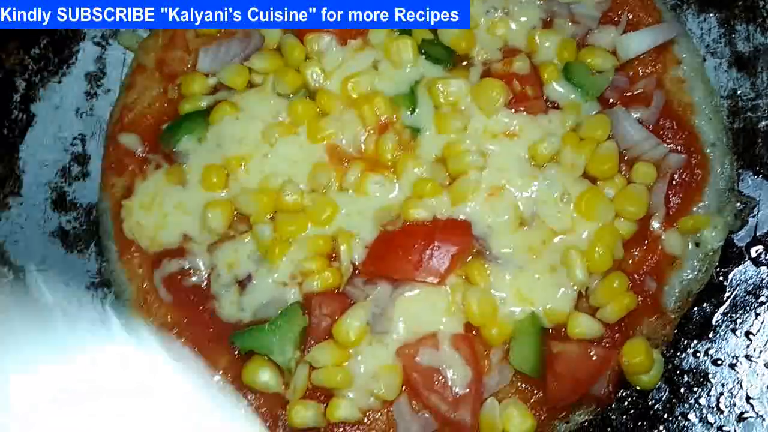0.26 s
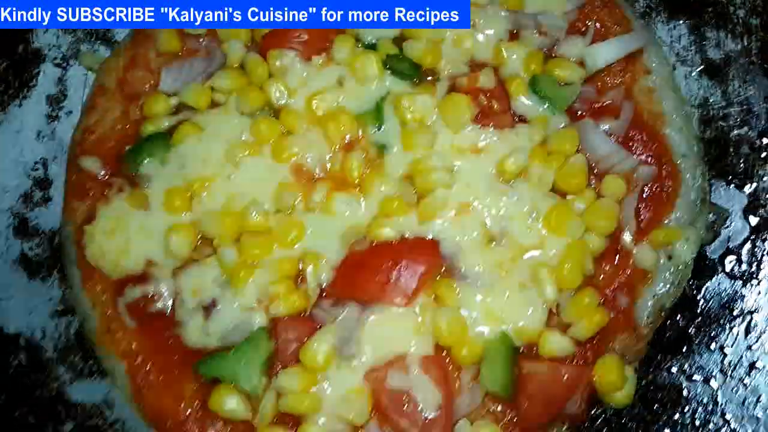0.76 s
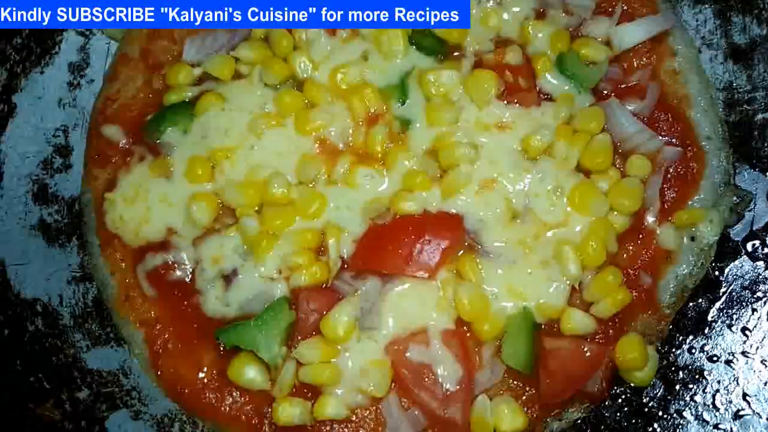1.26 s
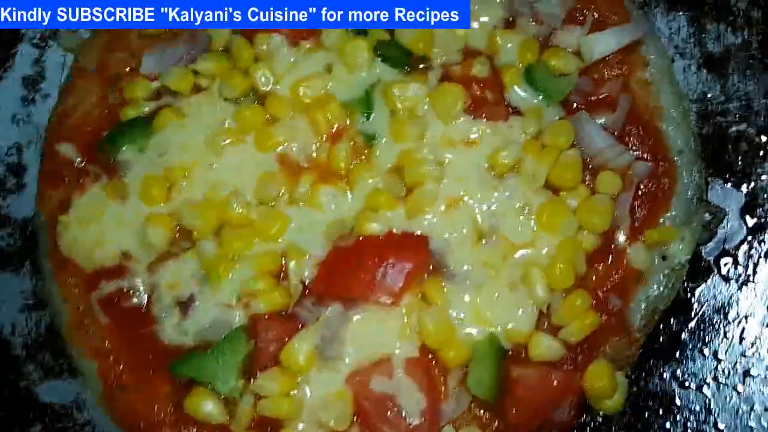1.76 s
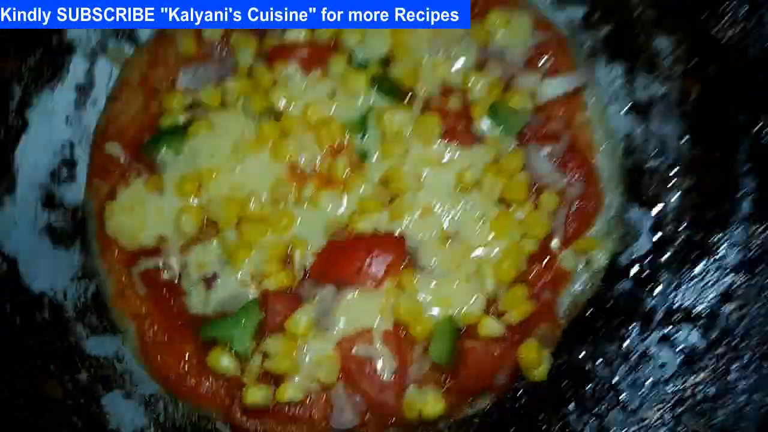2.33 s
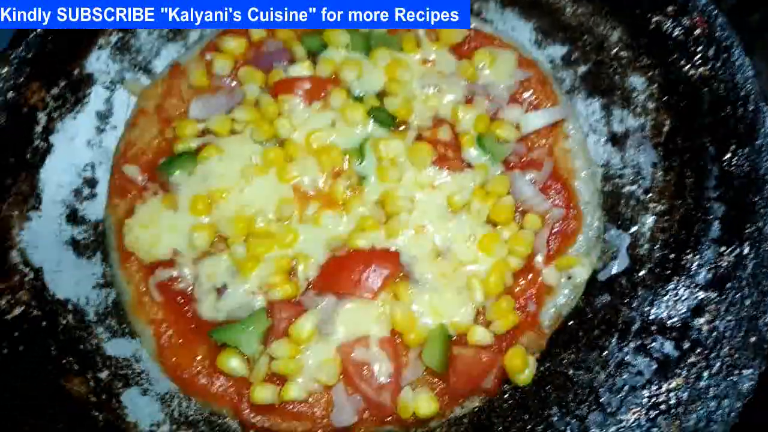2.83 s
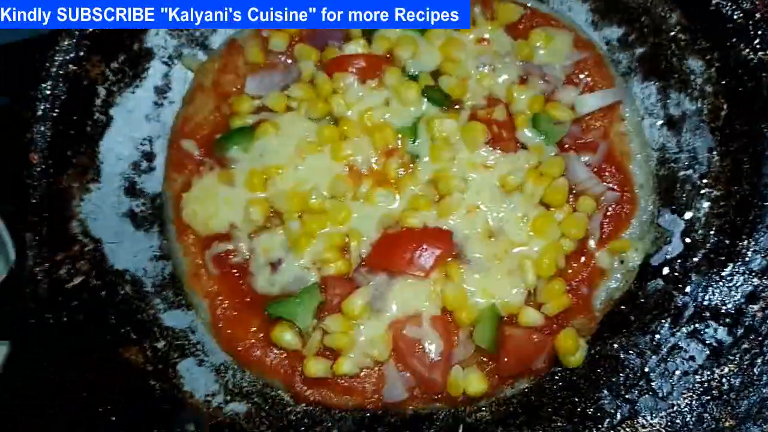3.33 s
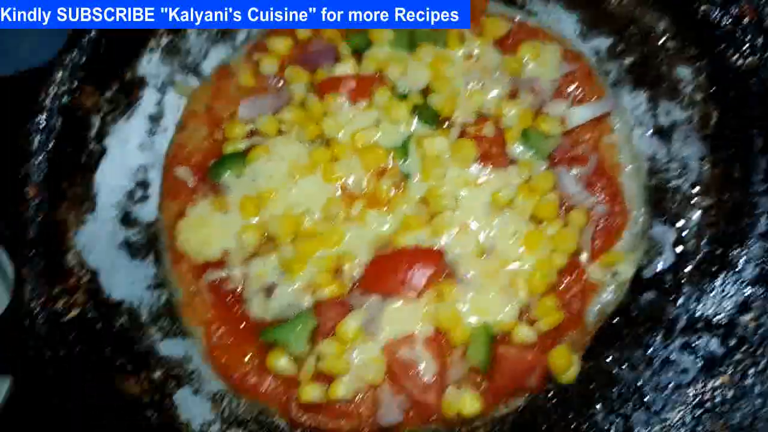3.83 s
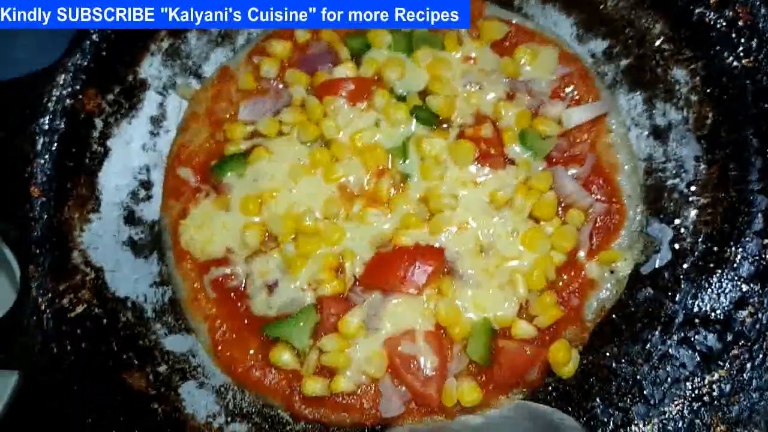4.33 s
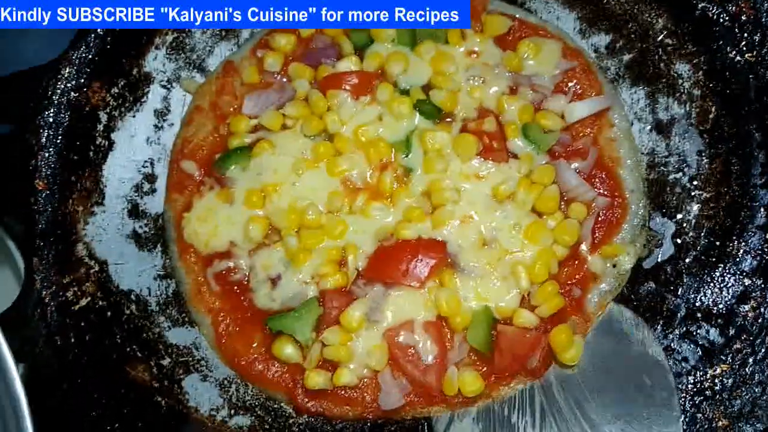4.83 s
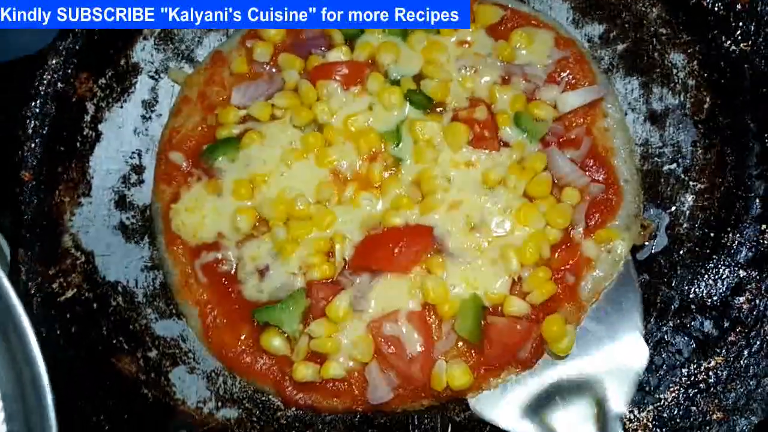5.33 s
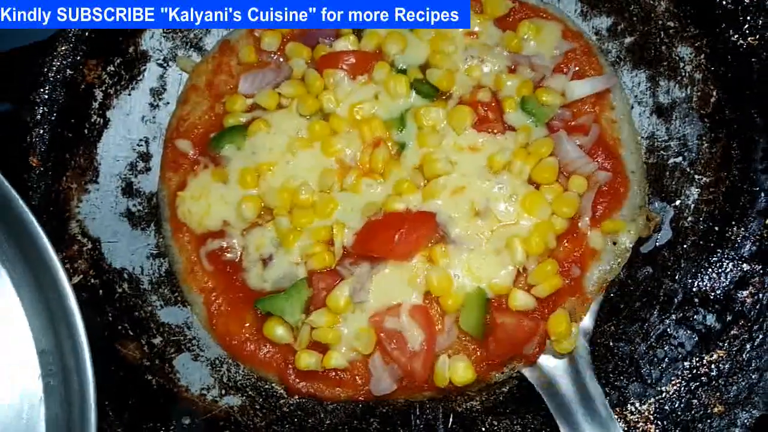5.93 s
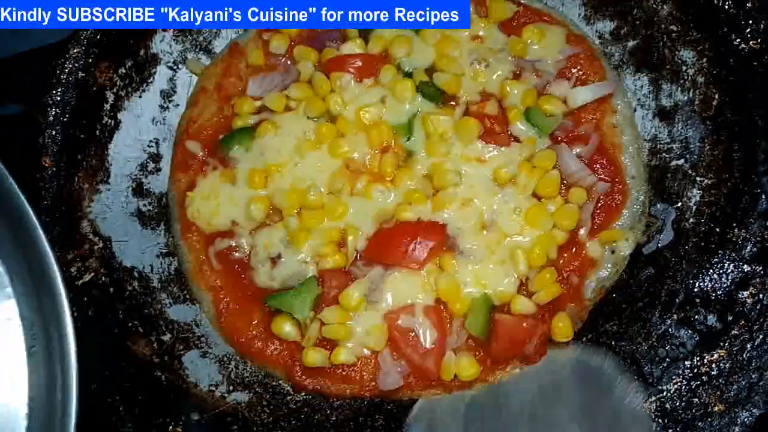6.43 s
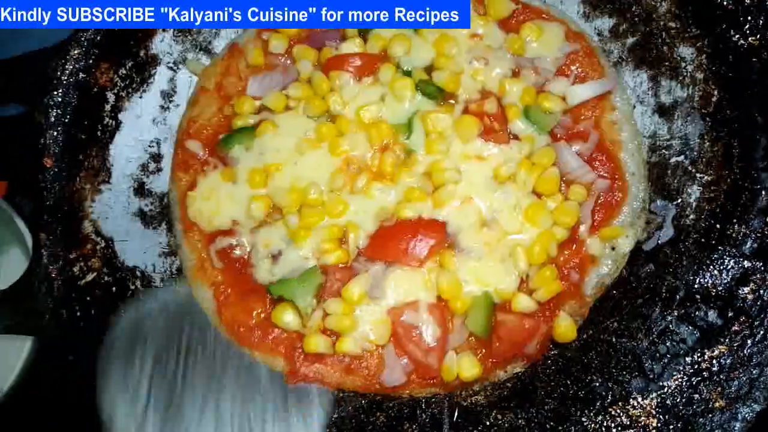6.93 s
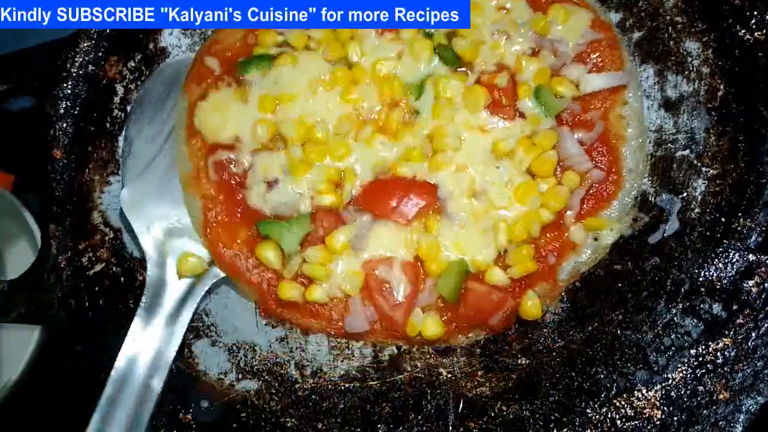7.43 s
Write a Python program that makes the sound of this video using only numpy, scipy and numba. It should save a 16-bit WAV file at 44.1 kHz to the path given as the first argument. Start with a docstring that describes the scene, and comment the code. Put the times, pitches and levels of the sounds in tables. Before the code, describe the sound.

Close to a stove in a small kitchen, a soft steady sizzle carries scattered oil pops. A motorbike booms away outside at first. Midway something drags in the room, the hand-held microphone is bumped and a utensil clatters. Then a metal spatula clicks and crunches under crisp dough, the griddle rocks in quickening knocks, and a loud long scrape follows, thinning to small rasps and renewed sizzling.

```python
"""In a small kitchen, close to the stove: a pancake sizzles on an oiled iron griddle, under a hand-held phone with two ports.
Oil and moisture crackle as random snaps; a steel spatula shears the crust, rocks the griddle, is drawn back
with one long scrape and goes in again: snaps ring blade and iron. The phone gets bumped and a utensil clatters.
Further off, filtered noise and reverberation make rumble, hum, a dragged vessel and things put down;
outside, a motorbike pulls away as a train of booming firings over a drone."""
import sys
import numpy as np
from scipy import signal
from scipy.fft import rfft, irfft
from scipy.io import wavfile
from scipy.ndimage import uniform_filter1d
from numba import njit

SR = 44100
rng = np.random.default_rng(int(sys.argv[2]) if len(sys.argv) > 2 else 0)


def store_pcm(level_fs):
    """Save levels as 16-bit WAV."""
    pcm = np.round(np.clip(level_fs, -1, 1) * 32767).astype(np.int16)
    wavfile.write(sys.argv[1], SR, np.atleast_2d(pcm).T)


N = 338820
TIME = np.arange(N) / SR
SHORT = TIME[:SR // 2]  # half a second, for single sounds
TOP_HZ = 12600  # nothing much is heard above this
HUM_HZ = 169.6  # pitch of the room's hum and of the motorbike's upper boom


def undb(db):
    """Decibels to gain."""
    return 10 ** (np.asarray(db) / 20)


def unit(x):
    """Scale to rms 1."""
    return x / np.sqrt(np.mean(x ** 2))


def peak(x):
    """Scale to peak 1."""
    return x / np.abs(x).max()


def curves(rows):
    """The columns after the time column, as one value per sample."""
    s, *columns = np.transpose(rows)
    return [np.interp(TIME, s, column) for column in columns]


def gate(start, end, edge=0.014):
    """One between two times, with soft edges."""
    return np.clip((TIME - start) / edge, 0, 1) * np.clip((end - TIME) / edge, 0, 1)


def envelope(start, length, rise, fade):
    """Rise, hold until start + length, then die away."""
    return np.clip((TIME - start) / rise, 0, 1) * np.exp(-np.maximum(TIME - start - length, 0) / fade)


def pan(db):
    """Left and right gains with mean 1, from left minus right in dB."""
    gains = undb(np.array([[db], [-db]]) / 2)
    return gains / gains.mean()


def add(out, s, sound):
    """Mix a short sound in at time s."""
    i = min(int(s * SR), N)
    out[:, i:i + sound.shape[-1]] += sound[..., :N - i]


def through(x, response):
    """Convolve, keeping the length."""
    return signal.oaconvolve(np.atleast_2d(x), np.atleast_2d(response), axes=1)[:, :x.shape[-1]]


def colour(points, size=4096):
    """Causal, minimum-phase impulse response with the given spectrum."""
    hz, db = np.transpose(points)
    f = np.maximum(np.fft.rfftfreq(size, 1 / SR), 1)
    log_gain = np.log(undb(np.interp(np.log(f), np.log(hz), db)))
    cepstrum = irfft(log_gain)
    # fold the cepstrum onto positive time
    cepstrum[1:size // 2] *= 2
    cepstrum[size // 2:] = 0
    return irfft(np.exp(rfft(cepstrum)))


def ring(resonances):
    """Impulse response of a body: decaying sines, signs alternating, from rows of Hz, width in Hz and dB."""
    response = 0
    for k, (hz, width, db) in enumerate(resonances):
        mode = np.exp(-np.pi * width * SHORT) * np.sin(2 * np.pi * hz * SHORT)
        response = response + undb(db) * width * mode * (-1) ** k
    return response


def lowpass(x):
    """Steep cut of the top that keeps clicks compact."""
    taps = signal.firwin(301, TOP_HZ, window=("kaiser", 8), fs=SR)
    return signal.oaconvolve(np.atleast_2d(x), taps[None], mode="same", axes=1)


def noise(likeness, size=N):
    """Two noises that share a part."""
    common, *own = rng.standard_normal((3, size))
    c = np.clip(likeness, 0, 1)
    return np.sqrt(c) * common + np.sqrt(1 - c) * np.array(own)


def walk(rate):
    """Smooth random wandering of rms 1, taking `rate` new values a second."""
    k = int(SR / rate)
    steps = np.repeat(rng.standard_normal(N // k + 1), k)[:N]
    return unit(uniform_filter1d(steps, k))


def grains(rate, spread_db, scatter_db, size=3):
    """Random tiny snaps, a few of them large; each from its own spot, so with its own balance and lag."""
    at = np.flatnonzero(rng.random(N - size) < rate / SR)
    strength_db = spread_db * np.minimum(rng.exponential(size=len(at)), 5)
    strength = undb(strength_db) * rng.choice([-1, 1], len(at))
    side = undb(scatter_db * rng.uniform(-1.09, 1, len(at)))
    out = np.zeros((2, N))
    out[0, at + 1] = strength * side
    out[1, at + rng.integers(0, size, len(at))] = strength / side
    return out


def smear(x, wet_db, t60):
    """Give every snap a short hissing tail of its own."""
    keep = undb(-120 / (t60 * SR))  # decay of power per sample
    tail = np.sqrt(signal.lfilter([1 - keep], [1, -keep], x ** 2))
    return x + undb(wet_db) * tail * rng.standard_normal(x.shape)


def play(drive, points):
    """Colour an excitation and bring it to rms 1."""
    return unit(lowpass(through(drive, colour(points))))


def echo(x, wet_db, t60):
    """Add diffuse reflections that die in t60 seconds, different at each ear."""
    decay = undb(-60 * SHORT / t60) * (1 - np.exp(-SHORT / 0.00027))
    tail = noise(0.17, size=len(SHORT)) * decay
    return x + undb(wet_db) * through(x, tail / np.sqrt(np.sum(tail ** 2) / 2))


def swishes(rows, drive, edge):
    """Each row lets the drive sound through one resonance for a moment."""
    out = np.zeros((2, N))
    for s, length, hz, width, db in rows:
        span = slice(int(s * SR), int((s + length) * SR))
        band = unit(through(drive[:, span], ring([(hz, width, 0)])))
        out[:, span] += band * gate(s, s + length, edge)[span] * undb(db)
    return out


@njit
def svf(x, hz, damping):
    """State-variable filter whose pitch moves every sample: (high-pass, band-pass)."""
    high, band, b, l = np.empty(len(x)), np.empty(len(x)), 0., 0.
    for i in range(len(x)):
        g = np.tan(np.pi * hz[i] / SR)
        v = (b + g * (x[i] - l)) / (1 + g * (g + damping))
        low = l + g * v
        high[i], band[i] = x[i] - damping * v - low, v
        b, l = 2 * v - b, 2 * low - l
    return high, band


# Spectrum of frying oil. Each row: frequency in Hz, level in dB per Hz.
OIL_SPECTRUM = [(500, -17.5), (2400, -7), (4400, -8), (6800, 1), (8100, -5.5), (9000, 0), (9900, 0),
                (10600, 5.5), (12300, 4.5)]
# Wet batter meets hot iron. Each row: start in seconds, level in dB, fade in seconds, left minus right in dB.
FRYING_FLARES = [(2.95, -47.5, 0.22, 2), (4.15, -56, 0.37, 0), (5.441, -40.5, 0.11, 2), (6.46, -44, 1, 1),
                 (7.58, -45, 0.36, 4)]
FRY_DB, FRY_PAN_DB, FLARE_RISE_S = -53.5, 5, 0.066


def frying():
    """Tiny steam bubbles burst in the oil, their strength wavering; each flare adds power to the steady frying."""
    power = (undb(FRY_DB) * pan(FRY_PAN_DB)) ** 2
    for s, db, fade, pan_db in FRYING_FLARES:
        flare = undb(db) * envelope(s, FLARE_RISE_S, FLARE_RISE_S, fade) * pan(pan_db)
        power = power + flare ** 2
    waver = undb(1.8 * walk(30))
    snaps = grains(1800, 4.1, 18.0) * waver
    return play(smear(snaps, -0.85, 0.16), OIL_SPECTRUM) * np.sqrt(power)


# Spectrum of the room's air. Each row: frequency in Hz, level in dB per Hz.
ROOM_SPECTRUM = [(20, -1), (48, -15), (68, 3.5), (110, 2.5), (270, -12), (800, -19), (5000, -23),
                 (12000, -37)]
# Course of the room's rumble. Each row: time in seconds, level in dB before RUMBLE_LIFT_DB is added.
RUMBLE_COURSE = [(3.0, -69), (3.96, -62), (6.43, -65.5), (7.68, -63)]
# Faint distant ringing and droning. Each row: start in seconds, length in seconds, pitch in Hz, level in dB.
FAR_TONES = [(0.717, 0.054, 495, -51), (0.805, 0.065, 492, -52.5), (1.893, 0.23, 782.6, -59),
             (3.12, 0.16, 870, -54), (4.39, 0.1, 2003, -60), (6.538, 1.14, 82.4, -60.5)]
# Resonances of a vessel. Each row: frequency in Hz, width in Hz, level in dB.
VESSEL_MODES = [(460, 53, 0.5), (600, 210, -11.5), (860, 90, -5.5), (996, 86, -10.5), (1540, 230, -19)]
RUMBLE_LIFT_DB = 7
DRAG_AT_S, DRAG_LENGTH_S, DRAG_DB, DRAG_RISE_S, DRAG_FADE_S = 2.86, 0.34, -50, 0.039, 0.11
TONE_WIDTH_SHARE = 0.011  # width of each ring as a share of its pitch
HUM_WIDTH_HZ, HUM_DB, HUM_ENDS_S = 11, -63.5, 5.1


def kitchen():
    """Low rumble and hum, a vessel dragged further off and other far sounds, all but the rumble reverberant."""
    rumble_db, = curves(RUMBLE_COURSE)
    air = noise(0.45)
    rumble = play(air, ROOM_SPECTRUM) * undb(rumble_db + RUMBLE_LIFT_DB + walk(5.6))
    drag = envelope(DRAG_AT_S, DRAG_LENGTH_S, DRAG_RISE_S, DRAG_FADE_S)
    vessel = unit(through(noise(0.45), ring(VESSEL_MODES)))
    far = vessel * undb(DRAG_DB + 2 * walk(25.03)) * drag + far_knocks()
    rings = [(s, length, hz, TONE_WIDTH_SHARE * hz, db) for s, length, hz, db in FAR_TONES]
    hum = (0, HUM_ENDS_S, HUM_HZ, HUM_WIDTH_HZ, HUM_DB)
    far += swishes(rings + [hum], noise(0.95), edge=0.016)
    return rumble + echo(far, -6.5, 0.66) * pan(1.6)


# The motorbike outside gathers speed. Each row: time in seconds, firings per second.
ENGINE_RATE = [(0.55, 15.5), (0.85, 17.2), (2.0, 18.7), (3.2, 19.4)]
# Strength of its booming firings. Each row: time in seconds, gain in dB.
BOOM_COURSE = [(0, -46.5), (0.22, -33), (0.28, -45.5), (0.41, -35.5), (0.47, -45), (0.73, -35.5),
               (0.85, -41.5), (1.0, -63)]
# Resonances of its drone. Each row: frequency in Hz, width in Hz, level in dB.
EXHAUST_MODES = [(104, 31, 1), (175, 35, -5), (228.5, 11.6, 0), (316, 16, -8)]
FIRST_FIRING_S, BOOM_HZ, DRONE_DB, DRONE_ENDS_S = 0.092, 83, -58.5, 3.54


def motorbike():
    """A single-cylinder engine outside: firings boom through the wall at first, over a drone of their harmonics."""
    rate, = curves(ENGINE_RATE)
    boom_db, = curves(BOOM_COURSE)
    turns = np.cumsum(rate) / SR - FIRST_FIRING_S * rate[0]  # one firing per whole turn
    count = np.floor(turns)
    firings = np.diff(count, prepend=count[0]) * undb(walk(20))
    swell = peak(SHORT ** 2 * np.exp(-SHORT / 0.0067))
    boom = swell * (np.sin(2 * np.pi * BOOM_HZ * SHORT) + 0.35 * np.sin(2 * np.pi * HUM_HZ * SHORT))
    # reflections scramble the harmonics, and each swells and fades by itself
    harmonics = 0
    for k in range(4, 20):
        harmonics = harmonics + np.sin(2 * np.pi * (k * turns + rng.random())) * undb(3 * walk(2))
    drone = unit(through(harmonics, ring(EXHAUST_MODES))) * undb(DRONE_DB) * gate(-1, DRONE_ENDS_S, 0.97)
    return through(firings * undb(boom_db), boom) + drone


# Spectrum of the steel blade. Each row: frequency in Hz, level in dB per Hz.
STEEL_SPECTRUM = [(700, -24), (1400, -14.5), (2200, -6.5), (4400, -6.5), (7000, -1), (8100, -2.5),
                  (10500, 3), (12300, 0.5)]
# Light rubs of blade and hand. Each row: start in seconds, length in seconds, pitch and width in Hz, level in dB.
LIGHT_RUBS = [(0.05, 0.66, 1390, 457, -64), (4.594, 0.077, 2500, 494, -49), (4.708, 0.035, 2580, 250, -41),
              (5.108, 0.07, 2070, 500, -49), (5.418, 0.03, 2600, 2500, -32), (7.25, 0.04, 850, 400, -50.5),
              (7.352, 0.029, 1566, 597, -42.5), (7.566, 0.039, 1410, 400, -46),
              (7.61, 0.12, 1410, 310, -50.5)]


def rubs():
    """Light friction of blade and hand: fine snaps, heard through one resonance at a time."""
    return swishes(LIGHT_RUBS, play(grains(2500, 3.5, 4.3), STEEL_SPECTRUM), edge=0.021) * pan(3.6)


# Spectrum of a spit's or crumb's snap. Each row: frequency in Hz, level in dB per Hz.
SNAP_SPECTRUM = [(2000, -20), (4400, -13.5), (5400, -1), (8200, 0.5), (12500, 8)]
# Drops of moisture boiling away. Each row: start in seconds, level in dB before the fade, fade in seconds, pitch in Hz.
MOISTURE_FIZZES = [(0.355, -43, 0.035, 7000), (0.826, -46, 0.046, 8500), (1.154, -45, 0.028, 6100),
                   (2.094, -38, 0.026, 6500), (3.107, -36, 0.02, 6800), (3.324, -38, 0.027, 7700),
                   (3.422, -29.5, 0.019, 11000), (4.19, -52.5, 0.12, 6300)]
FIZZ_RISE_S, FIZZ_WIDTH_HZ, FIZZ_PAN_DB = 0.0054, 2000, 12


def fizzes():
    """A drop of moisture boils away in a short crackle with a pitch of its own."""
    out, droplets = np.zeros((2, N)), play(grains(2200, 4.1, 9.0), SNAP_SPECTRUM)
    for s, db, fade, hz in MOISTURE_FIZZES:
        i = int(s * SR)
        crackle = unit(through(droplets[:, i:i + len(SHORT)], ring([(hz, FIZZ_WIDTH_HZ, 0)])))
        shape = np.minimum(SHORT / FIZZ_RISE_S, 1) * np.exp(-SHORT / fade)
        add(out, s, crackle * shape * undb(db) * pan(FIZZ_PAN_DB))
    return out


# Spectrum of a snap's fuller body. Each row: frequency in Hz, level in dB per Hz.
BODY_SPECTRUM = [(200, -10.5), (700, 9), (1500, 7), (3700, 16.5), (6000, -27)]
# The loudest oil spits. Each row: time in seconds, snap peak in dB, left minus right in dB.
OIL_SPITS = [(0.361, -20.5, 14), (0.834, -29, 18), (1.829, -23.5, 9), (2.0904, -13, 9), (2.4092, -26, 0),
             (2.9496, -19.5, 10), (3.326, -28, 13), (3.422, -22.5, 20), (3.426, -21.5, 21), (3.674, -28, 9),
             (3.86, -22, 2), (4.077, -28, 10), (4.162, -24, 9), (4.206, -29, 10), (4.295, -27, 3)]
# The blade ticks on iron and crust. Each row: time in seconds, snap peak in dB, left minus right in dB,
# body level in dB relative to the snap peak.
BLADE_TICKS = [(4.6015, -17, 23, -22), (4.7284, -10, 2, -65), (4.924, -21.5, 6, -40), (5.467, -13, 15, -47),
               (5.73, -9, 2, -23), (5.7692, -3.5, -11, -31), (6.217, -9, 2, -31), (6.3596, -9, 2, -29.5),
               (6.3731, -15, 22, -25.5), (6.4846, -25.5, 28, -16), (6.805, -16.5, -23, -26.5),
               (7.132, -15, -11, -30.5)]
# a spit's relative body level at the usual peak, and dB more per dB of peak
SPIT_USUAL_DB, SPIT_BODY_DB, SPIT_BODY_GROWTH = -26, -39.5, 1.0


def pops():
    """Oil spits and blade ticks: sharp snaps, each followed by a faint spray; a bigger spit has more body."""
    out = np.zeros((2, N))
    snap = peak(lowpass(np.pad(colour(SNAP_SPECTRUM), (SR // 1000, 0))))[0]
    body = np.pad(colour(BODY_SPECTRUM), (SR // 1000, 0))
    body = body / np.std(body[SR // 1000:SR // 375])
    spits = []
    for s, db, pan_db in OIL_SPITS:
        spits.append((s, db, pan_db, SPIT_BODY_DB + SPIT_BODY_GROWTH * (db - SPIT_USUAL_DB)))
    for s, db, pan_db, body_db in BLADE_TICKS + spits:
        fall = 0.17 * np.exp(-SHORT / 0.0012) + 0.018 * np.exp(-SHORT / 0.03)
        spray = noise(0.16, size=len(SHORT)) * fall
        spray[:, 0] = 1  # the snap itself
        add(out, s, through(spray, snap + undb(body_db) * body) * undb(db) * pan(pan_db))
    return out


# Knocks on the phone's case. Each row: time in seconds, thud peak in dB, click peak in dB, click pitch in Hz,
# click left minus right in dB, share of rubbing in the push.
CASE_BUMPS = [(0.388, -22, -33, 7000, 3, 0.28), (3.7499, -11.5, -22, 4500, -22, 0.045),
              (3.7546, -29, -7, 7460, -29, 0.34), (3.7652, -52, -7, 10550, -32, 0.091)]
# Spectrum of the thud. Each row: frequency in Hz, level in dB per Hz.
THUD_SPECTRUM = [(25, -22), (90, 6.5), (260, 2.5), (900, -7), (1500, -7.5), (6000, -22.5)]


def handling():
    """The hand knocks the phone's case: a low thud and a bright creaking click."""
    out = np.zeros((2, N))
    grip = pan(-13)
    for s, thud_db, click_db, hz, pan_db, rub in CASE_BUMPS:
        # the case is pressed in, rubs and springs back softly
        push = rub * noise(0.53, size=len(SHORT)) * np.exp(-SHORT / 0.0063)
        push[:, 0] += 0.6
        release = np.exp(-((SHORT - 0.0024) / 0.00029) ** 2)
        thud = peak(through(push - release / release.sum(), colour(THUD_SPECTRUM)))
        add(out, s, thud * undb(thud_db) * grip)
        creak = noise(0.79, size=len(SHORT)) * SHORT * np.exp(-SHORT / 0.00041)
        click = peak(through(creak, ring([(hz, 1100, 0), (11000, 1500, -9)])))
        add(out, s, click * undb(click_db) * pan(pan_db))
    return out


# Things put down across the room. Each row: time in seconds, thump level in dB, thump fade in seconds, clack level in dB.
PUT_DOWNS = [(1.462, -61.5, 1, -55.5), (3.914, -45, 0.034, -38.5), (3.975, -37.5, 0.053, -44)]
# Resonances of the thump on the counter. Each row: frequency in Hz, width in Hz, level in dB.
COUNTER_MODES = [(170.7, 26, 9), (397, 123, 3.5), (600, 200, 1.5), (924, 83, 2.5), (1510, 300, -16)]
# Resonances of the clack. Each row: frequency in Hz, width in Hz, level in dB.
CLACK_MODES = [(387, 88, 2.5), (944, 83, 3), (1560, 420, -2), (2600, 420, -3)]
THUMP_RISE_S, FAR_CLACK_FADE_S = 0.015, 0.016


def far_knocks():
    """Things put down across the room: a brief clack, and a thump that swells more slowly and lingers."""
    thump = sum(undb(db) * envelope(s, 0, THUMP_RISE_S, fade) for s, db, fade, _ in PUT_DOWNS)
    clack = sum(undb(db) * envelope(s, 0, 0.0028, FAR_CLACK_FADE_S) for s, _, _, db in PUT_DOWNS)
    counter = unit(through(noise(0.99), ring(COUNTER_MODES))) * undb(2 * walk(10))
    edge = unit(through(noise(0.44), ring(CLACK_MODES)))
    return counter * thump + edge * clack


# Modes of the steel utensil. Each row: frequency in Hz, relative level in dB, time in seconds to fall by 60 dB.
UTENSIL_MODES = [(1630, -4.5, 0.15), (2770, -4.5, 0.066), (4996, -3, 0.06), (6600, -1, 0.079),
                 (8830, 7.5, 0.04)]
# Spectrum of its chatter. Each row: frequency in Hz, level in dB per Hz.
CHATTER_SPECTRUM = [(100, 10), (300, -6.5), (1000, 1.5), (4800, -0.5), (6700, 1), (8000, -10), (12000, 1)]


def clatter():
    """A steel utensil chatters briefly, lands and rings on in decaying modes."""
    out = np.zeros((2, N))
    chatter = noise(0.27, size=len(SHORT)) * np.exp(-SHORT / 0.012) * np.minimum(SHORT / 0.0014, 1)
    modes = sum(undb(db - 60 * SHORT / t60) * np.sin(2 * np.pi * hz * SHORT) for hz, db, t60 in UTENSIL_MODES)
    add(out, 3.7735, undb(-13) * peak(through(chatter, colour(CHATTER_SPECTRUM))) * pan(4.5))
    add(out, 3.778, undb(-21.5) * peak(modes) * pan(7.8))
    return echo(out, -10.0, 0.29)


# Spectrum of sheared crust. Each row: frequency in Hz, level in dB per Hz.
CRUST_SPECTRUM = [(1000, -37), (2300, -9.5), (3500, -20.5), (4700, -20), (5300, -1), (7000, 3.5),
                  (9300, 5.5), (9900, -20)]
# The blade slides in under the crust. Each row: start in seconds, length in seconds, level in dB, top of the hiss in Hz.
BLADE_PUSHES = [(4.598, 0.14, -40, 9000), (4.804, 0.12, -47.5, 9800), (4.97, 0.055, -43, 9800),
                (5.11, 0.11, -48, 8340), (5.52, 0.055, -39, 7340)]
# Crust breaks at the blade's edge. Each row: time in seconds, level in dB, fade in seconds, left minus right in dB.
CRUST_CRUNCHES = [(4.606, -30, 0.059, 12), (4.721, -32.5, 0.014, 6), (5.01, -36.5, 0.034, 11),
                  (5.114, -31, 0.04, 7), (5.424, -32, 0.064, 17), (7.032, -32, 0.027, -23),
                  (7.126, -33.5, 0.081, 0)]
PUSH_RISE_S, PUSH_FADE_S = 0.027, 0.098


def crust():
    """The blade shears through crisp batter in short grainy pushes; now and then a larger piece crunches."""
    out = np.zeros((2, N))
    shear = grains(2200, 4.2, 4.5) * undb(1.8 * walk(60))
    glide = play(smear(shear, -8.0, 0.025), CRUST_SPECTRUM)
    for s, length, db, top_hz in BLADE_PUSHES:
        hiss = signal.sosfilt(signal.butter(8, min(top_hz, TOP_HZ), fs=SR, output="sos"), glide)
        out += hiss * undb(db) * envelope(s, length, PUSH_RISE_S, PUSH_FADE_S) * pan(7.3)
    crumbs = play(smear(grains(2600, 4.4, 6), -6, 0.025), SNAP_SPECTRUM)
    for s, db, fade, pan_db in CRUST_CRUNCHES:
        out += crumbs * undb(db) * envelope(s, 0, 0.0062, fade) * pan(pan_db)
    return out


# The blade nudges the griddle, then drops it and it rocks to rest.
# Each row: time in seconds, clack peak in dB, body peak in dB, share of rattle in the blow.
GRIDDLE_ROCKS = [(5.0, -32.5, -39, 0.12), (5.1472, -25, -30, 0.11), (5.217, -22, -32.5, 0.026),
                 (5.2695, -24.5, -34.5, 0.014), (5.3135, -31, -44, 0.052), (5.354, -37.5, -43.5, 0.057),
                 (5.389, -37.5, -38, 0.076)]
# Resonances of the griddle's rim, before scatter. Each row: frequency in Hz, width in Hz, level in dB.
RIM_MODES = [(1724, 196, -3), (2013, 136, 2), (2460, 74, -6), (3400, 930, -17)]
# Resonances of the griddle's body, before scatter. Each row: frequency in Hz, width in Hz, level in dB.
GRIDDLE_MODES = [(380, 320, -11), (668, 105, -1), (854, 115, -0.5), (1000, 340, -9)]
RATTLE_FADE_S, BODY_FADE_S = 0.024, 0.029


def griddle():
    """The griddle tips and settles in ever quicker knocks: a bright ringing clack of the rim over a dull body."""
    clacks, thuds = np.zeros((2, 2, N))
    for s, clack_db, body_db, rattle in GRIDDLE_ROCKS:
        blow = noise(0.61, size=len(SHORT)) * rattle * np.exp(-SHORT / RATTLE_FADE_S)
        blow[:, 0] = 1
        # each knock lands on another spot, so the pitches scatter
        rim = ring([(hz * (1 + 0.02 * rng.standard_normal()), width, db) for hz, width, db in RIM_MODES])
        add(clacks, s, peak(through(blow, rim)) * undb(clack_db) * pan(8.9))
        shake = noise(0.96, size=len(SHORT)) * np.exp(-SHORT / BODY_FADE_S)
        shake[:, 0] = 12
        body = ring([(hz * (1 + 0.08 * rng.standard_normal()), width, db) for hz, width, db in GRIDDLE_MODES])
        add(thuds, s, peak(through(shake, body)) * undb(body_db) * pan(1.2))
    # the room holds on to the low notes; the bright clack is soon gone
    return echo(clacks, -12, 0.18) + echo(thuds, -3, 0.5)


# Blade resonances, around which the pitch wanders. Each entry: frequency in Hz.
BLADE_MODES = [3630, 6220, 7110, 9520, 10750]
BLADE_WIDTH_SHARE, BLADE_DRIFT_SHARE = 0.025, 0.045  # shares of each pitch


def shifting(x):
    """The blade's narrow resonances stand out and wander in pitch as the contact point skips."""
    centres = [hz * (1 + BLADE_DRIFT_SHARE * walk(22)) for hz in BLADE_MODES]
    modes = np.array([sum(svf(side, hz, BLADE_WIDTH_SHARE)[1] for hz in centres) for side in x])
    return unit(x + BLADE_WIDTH_SHARE * modes)


# Spectrum of the scraped iron. Each row: frequency in Hz, level in dB per Hz.
IRON_SPECTRUM = [(300, -31), (700, 0.5), (1100, -3), (1400, 5), (1900, 6), (3000, -29)]
# The blade is drawn back: it bites, flattens on the iron, lifts, catches once more and leaves.
# Each row: time in seconds, gain in dB, low edge of the contact in Hz.
BLADE_PULL = [(5.66, -40, 1900), (5.691, -18, 1200), (5.734, -17, 1050), (5.85, -20.5, 1250),
              (6.091, -18.5, 590), (6.175, -20.5, 940), (6.25, -30.5, 1720), (6.295, -23.5, 1950),
              (6.368, -36.5, 1990), (6.43, -48, 2200)]
IRON_DB, LOWEST_RING_HZ = -15.5, 575  # iron relative to blade; low cut of both


def scrape():
    """Steel sticks and slips on rough iron: dense snaps ring the blade, and the griddle while the blade lies flat."""
    effort_db, edge_hz = curves(BLADE_PULL)
    slips = grains(7000, 2.8, 2.5) * undb(1.4 * walk(140))
    hissing = echo(smear(slips, -6.5, 0.018), -7.5, 0.04)
    blade = shifting(play(hissing, STEEL_SPECTRUM)) * pan(5.8)
    iron = play(echo(slips, -15.0, 0.16), IRON_SPECTRUM) * undb(IRON_DB) * pan(3.5)
    low_cut = signal.butter(6, LOWEST_RING_HZ, "high", fs=SR, output="sos")
    body = signal.sosfilt(low_cut, blade + iron)
    # the smaller the contact, the thinner the low end
    contact = np.array([svf(side, edge_hz, 1.42)[0] for side in body])
    return contact * undb(effort_db) * gate(BLADE_PULL[0][0], BLADE_PULL[-1][0], 0.0084)


# The tip skates on. Each row: time in seconds, ring in Hz, level in dB.
TIP_COURSE = [(6.2, 2110, -43.5), (6.31, 2270, -42), (6.45, 2520, -54), (6.515, 2880, -48),
              (6.565, 2900, -57.5), (6.61, 2980, -51.5), (6.69, 2850, -59), (6.762, 2750, -72)]
TIP_WIDTH_SHARE = 0.42  # damping of the ring, as a share of its pitch


def tip():
    """The blade's tip skates over the iron in rough spurts, its ring mostly rising as the contact shrinks."""
    hz, db = curves(TIP_COURSE)
    slips = grains(2200, 4.2, 3) * undb(2.5 * walk(80))
    once = [svf(side, hz, TIP_WIDTH_SHARE)[1] for side in slips]
    rasp = np.array([svf(side, hz, TIP_WIDTH_SHARE)[1] for side in once])
    return unit(rasp) * undb(db) * gate(TIP_COURSE[0][0], TIP_COURSE[-1][0]) * pan(3.5)


# The left port faces the griddle's middle range. Each row: frequency in Hz, left minus right in dB.
PORT_BALANCE = [(400, -2.5), (1500, 3), (5000, 8), (8000, 2), (11000, -2.5)]


def scene():
    """The stove through two ports with the kitchen's short reverberation, and the sounds around it."""
    ports = [colour([(hz, side * db / 2) for hz, db in PORT_BALANCE]) for side in (1, -1)]
    food = frying() + fizzes() + pops() + crust()
    blade = rubs() + scrape() + tip()
    stove = through(food + blade, ports) + handling()
    return echo(stove, -10.5, 0.29) + kitchen() + motorbike() + clatter() + griddle()


def record(dry):
    """The phone rounds the loudest peaks and cuts the top."""
    return lowpass(np.tanh(dry))


dry = scene()
out = record(dry)
store_pcm(out)
```